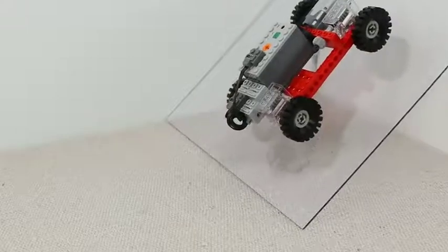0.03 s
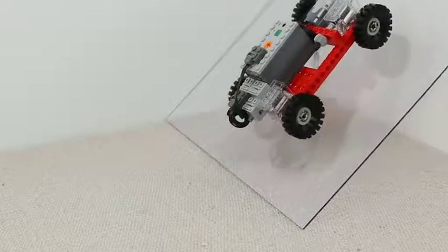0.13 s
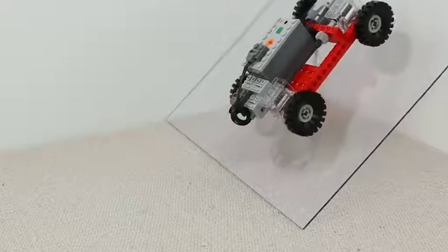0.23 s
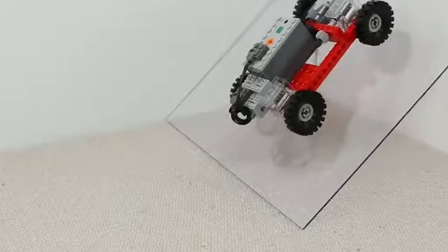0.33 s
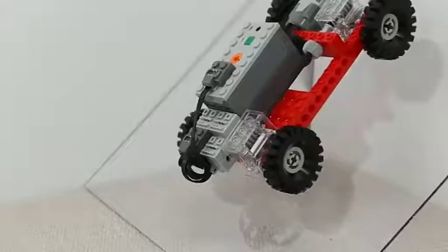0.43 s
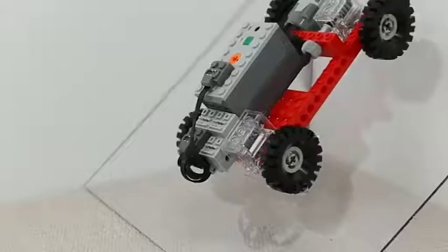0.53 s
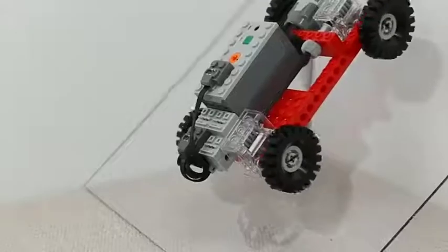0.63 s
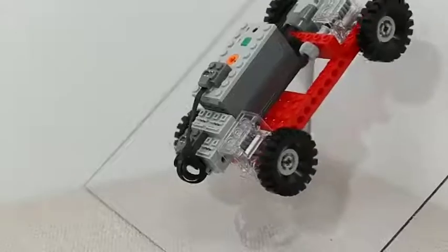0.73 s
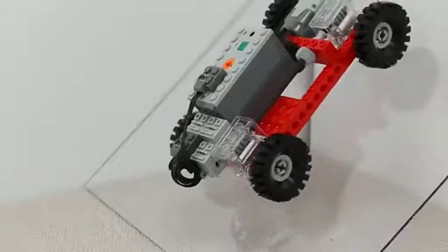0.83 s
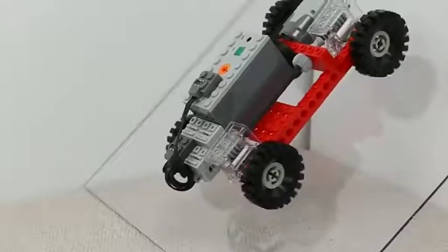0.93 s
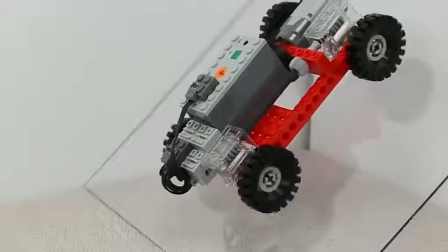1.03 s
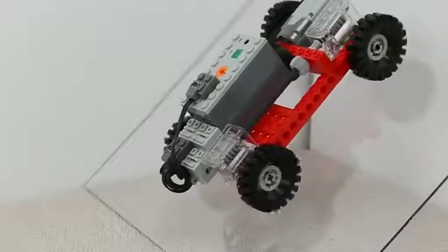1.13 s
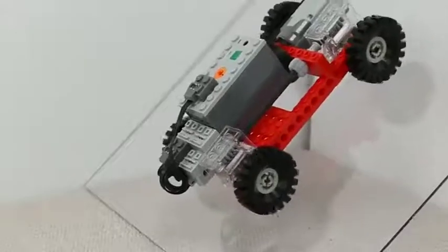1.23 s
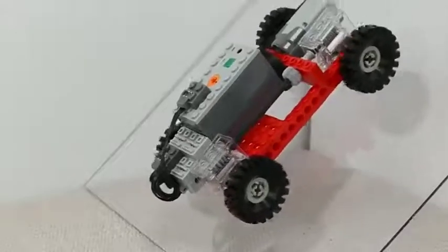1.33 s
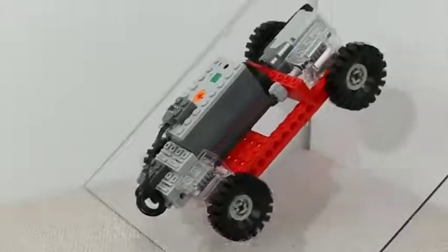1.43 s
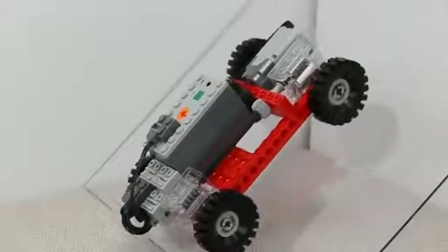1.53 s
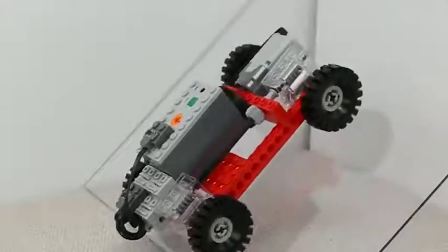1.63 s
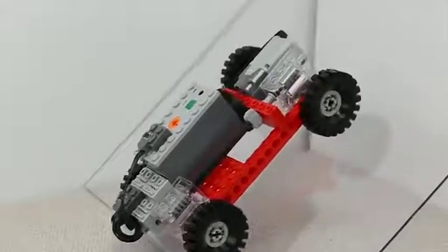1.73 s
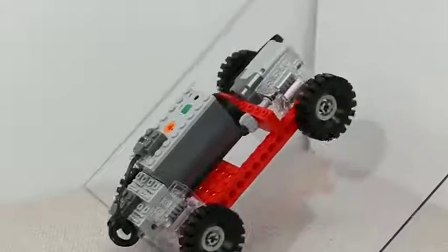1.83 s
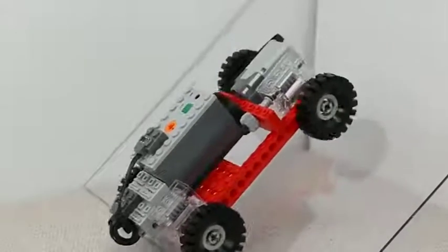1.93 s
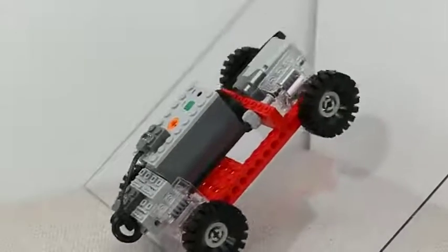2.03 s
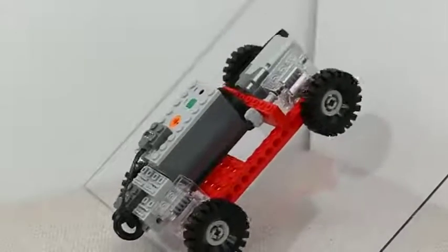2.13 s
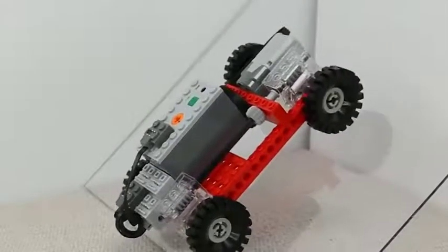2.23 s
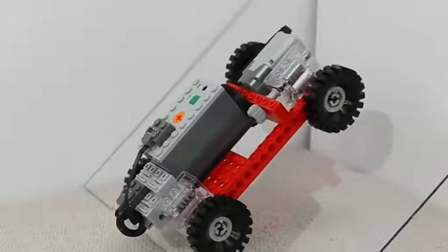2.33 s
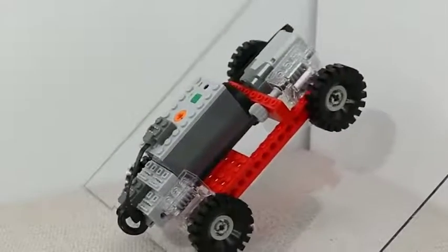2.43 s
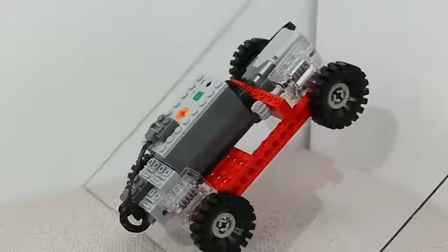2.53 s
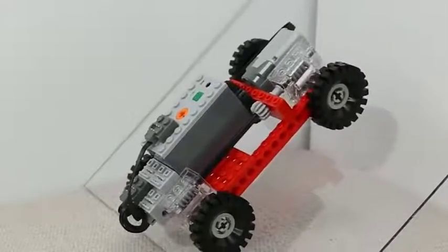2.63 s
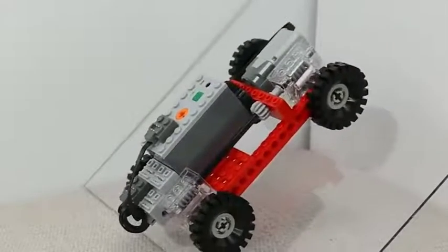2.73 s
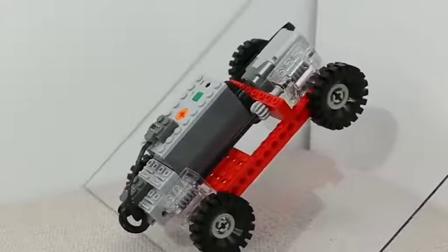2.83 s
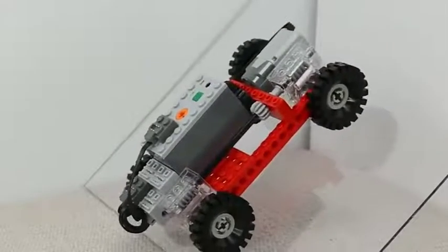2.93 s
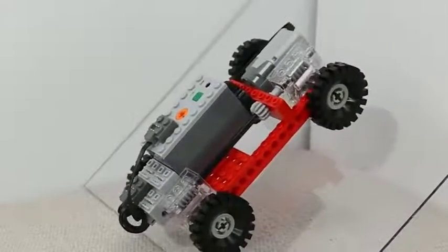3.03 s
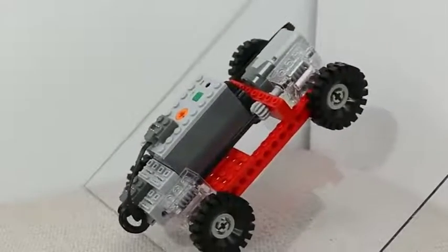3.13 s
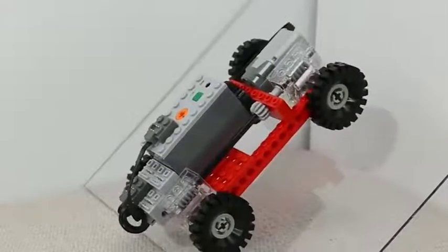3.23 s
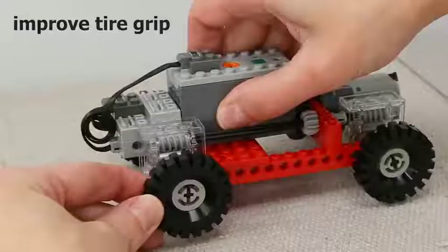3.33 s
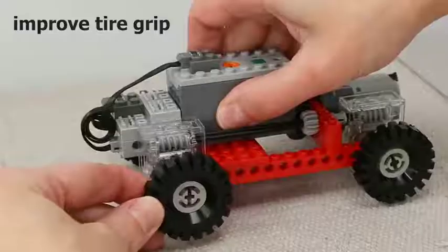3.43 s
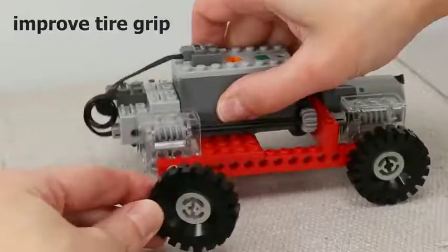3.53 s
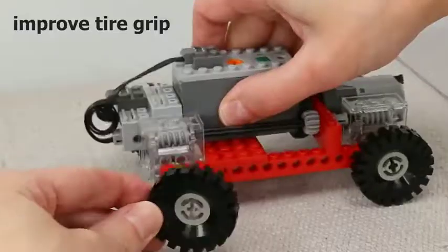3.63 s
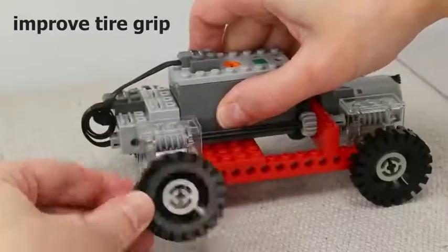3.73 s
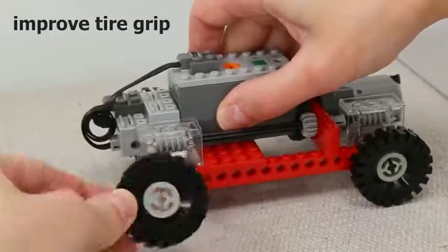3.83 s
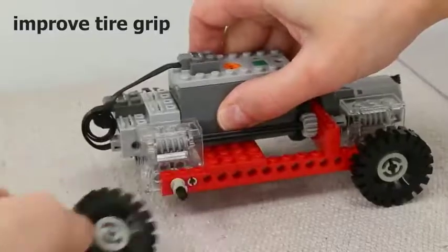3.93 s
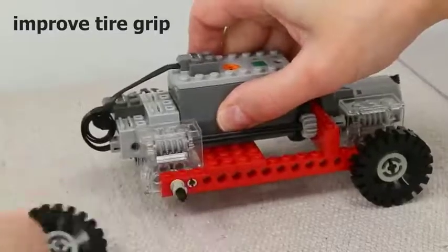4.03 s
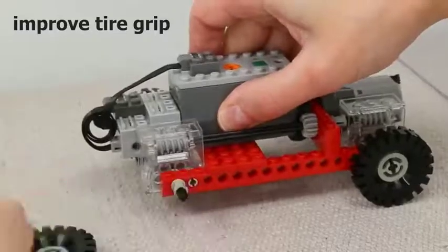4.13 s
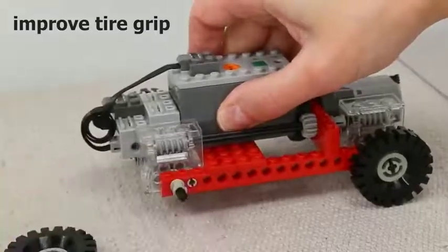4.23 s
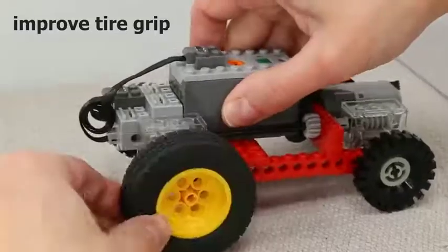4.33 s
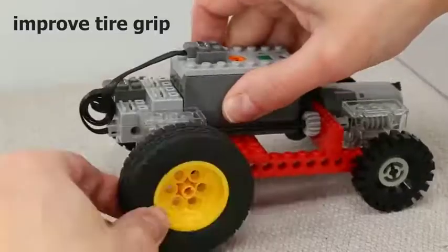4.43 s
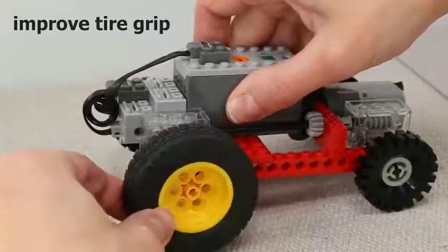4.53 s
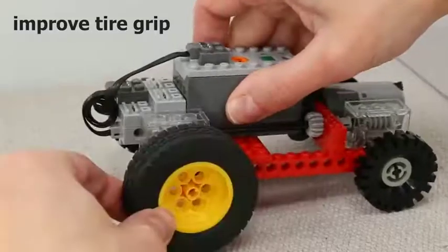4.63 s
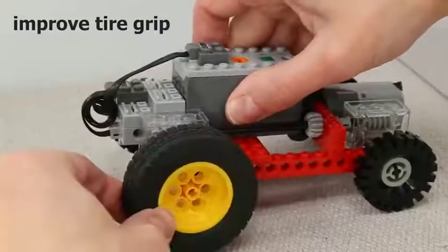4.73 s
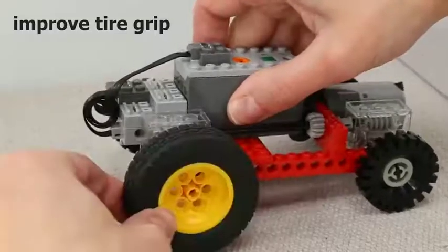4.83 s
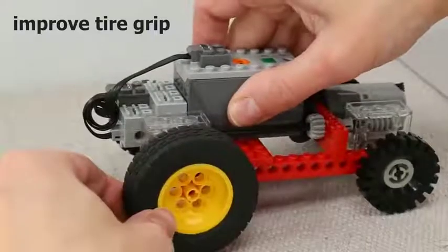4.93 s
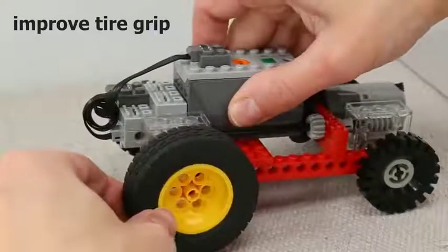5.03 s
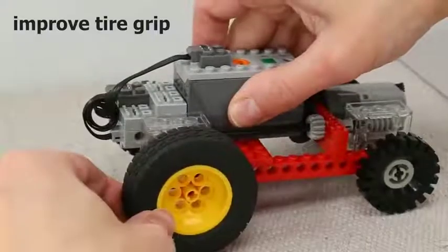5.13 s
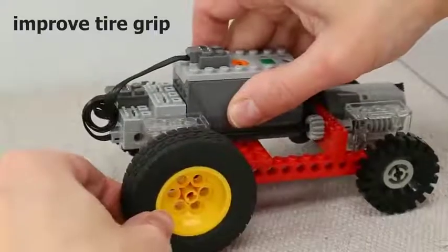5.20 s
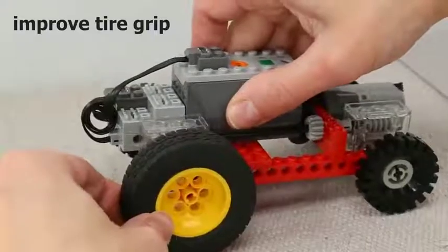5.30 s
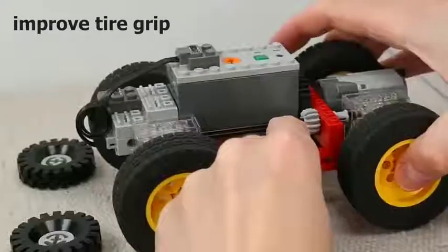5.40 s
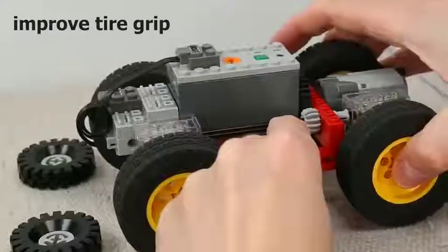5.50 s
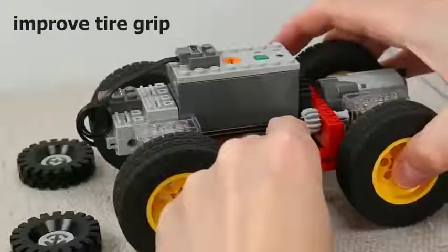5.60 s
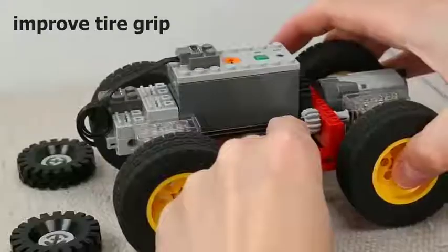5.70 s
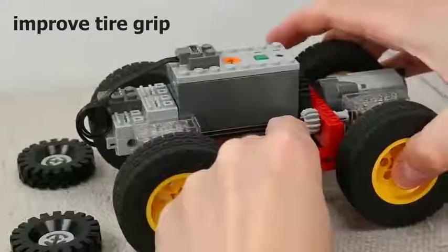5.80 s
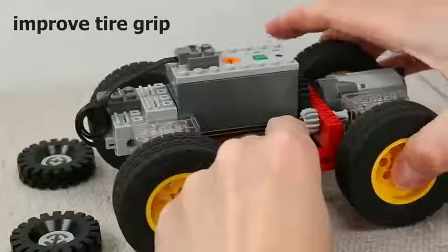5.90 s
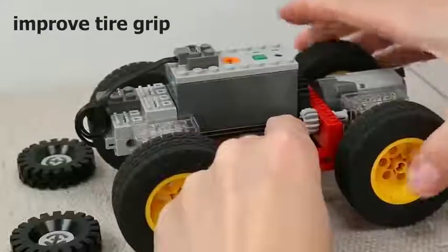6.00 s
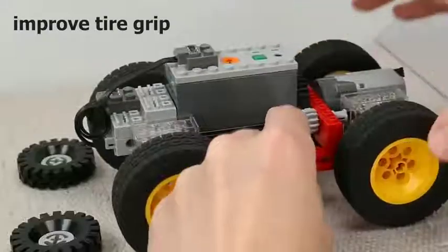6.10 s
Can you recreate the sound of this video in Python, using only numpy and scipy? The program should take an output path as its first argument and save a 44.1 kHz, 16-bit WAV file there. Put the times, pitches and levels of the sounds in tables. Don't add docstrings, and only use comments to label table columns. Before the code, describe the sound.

Buzzing, grinding toy gears strain and skip on a humming plastic sheet, stop dead, then soft rustles, a rubbery thud, and small hard clicks in a quiet room.

```python
import sys
import numpy as np
from scipy import signal
from scipy.fft import rfft, irfft, next_fast_len
from scipy.io import wavfile
from scipy.ndimage import uniform_filter1d

SR = 44100
rng = np.random.default_rng(int(sys.argv[2]) if len(sys.argv) > 2 else 0)


def attenuation_scalar(level_db):
    decades = np.asarray(level_db, float) / 20
    return 10 ** decades


def bounce(signal):
    frames = np.transpose(np.atleast_2d(signal))
    limited = np.clip(frames, -1, 1)
    pcm = np.round(limited * 32767).astype(np.int16)
    wavfile.write(sys.argv[1], SR, pcm)


N = 271654

# (time [s], peak level [dB], ring frequency [Hz])
SKIPS = [(0.042, -16.5, 3150), (0.1038, -21, 3050), (0.181, -24, 2900), (0.7555, -22, 4600),
         (0.8157, -20, 3400), (0.9102, -15, 4270), (0.933, -15, 4500), (0.9916, -20, 3390),
         (1.1663, -23, 4400), (1.3469, -19.5, 4370), (1.4305, -29, 4080), (1.4606, -21.5, 3640),
         (1.5095, -24, 3400), (1.531, -13, 3100), (1.62, -17, 3650), (1.7448, -21, 4480),
         (1.9108, -10, 3900), (2.1413, -23, 3650), (2.173, -31, 4640), (2.254, -28, 3680),
         (2.39, -19.5, 3770), (2.4913, -28, 3420)]
STOP_S = 2.595
SLIDE_S, SLIDE_LASTS_S = 1.63, 0.082
STEADY_S = 0.089


def rms_one(x):
    return x / np.sqrt(np.mean(x ** 2) + 1e-20)


def in_time(rows, before_db=-120, after_db=-120):
    s, *columns = np.transpose(rows)
    t = np.arange(N) / SR
    return [np.interp(t, s, column, before_db, after_db) for column in columns]


def bell(s, half):
    return np.exp(-2 * ((np.arange(N) / SR - s) / half) ** 2)


def drift(rate):
    r = np.exp(-2 * np.pi * rate / SR)
    slow = signal.lfilter([1], [1, -2 * r, r * r], rng.standard_normal(N + SR))
    return rms_one(slow[SR:])


def evened(x, span_s):
    power = uniform_filter1d(x ** 2, round(span_s * SR))
    return rms_one(x / (power + .05 * np.mean(x ** 2)) ** .4)


def colour(x, spectrum, peaks=()):
    size = next_fast_len(N)
    hz = np.arange(size // 2 + 1) * SR / size + 1
    points = np.array(spectrum)
    db = np.interp(np.log(hz), np.log(points[:, 0]), points[:, 1])
    for centre_hz, width_hz, peak_db in peaks:
        db = db + peak_db / (1 + (2 * (hz - centre_hz) / width_hz) ** 2)
    return rms_one(irfft(rfft(x, size) * attenuation_scalar(db), size)[:N])


def band(x, low_hz, high_hz, order=2):
    sos = signal.butter(order, [low_hz, min(high_hz, 19000)], "band", fs=SR, output="sos")
    return signal.sosfilt(sos, x)


def moving_band(x, hz, width_hz):
    turn = np.exp(2j * np.pi * np.cumsum(hz) / SR)
    r = np.exp(-np.pi * width_hz / SR)
    return 2 * np.real(signal.lfilter([1 - r], [1, -r], x / turn) * turn)


def octave_parts(x):
    lows = []
    for hz in 800 * 1.6 ** np.arange(7):
        lows.append(signal.sosfiltfilt(signal.butter(2, hz, fs=SR, output="sos"), x))
    return np.diff([0 * x] + lows + [x], axis=0)


def resonances(x, modes):
    out = 0
    for k, (hz, width_hz, db) in enumerate(modes):
        r = np.exp(-np.pi * width_hz / SR)
        a = [1, -2 * r * np.cos(2 * np.pi * hz / SR), r * r]
        mode = (1 - r * r) / 2 * signal.lfilter([1, 0, -1], a, x)
        out = out + (-1) ** k * attenuation_scalar(db) * mode
    return rms_one(out)


def struck(modes, t):
    return sum(attenuation_scalar(db - 60 * t / t60) * np.sin(2 * np.pi * hz * t) for hz, db, t60 in modes)


def add(out, x, s):
    at = round(s * SR)
    out[at:at + len(x)] += x[:N - at]


def gear_knocks():
    rotor_hz, teeth_per_s = 124.7, 2600
    turn = 2 * np.pi * np.cumsum(rotor_hz * (1 + .015 * drift(1.92))) / SR
    force_db = 3.5 * np.minimum(rng.exponential(1, N), 3.5)
    force = attenuation_scalar(force_db) * rng.choice([-1, 1], N)
    teeth = rms_one(force * (rng.random(N) < teeth_per_s / SR))
    motor_brushes = 1.2 * rng.standard_normal(N)
    clumps = attenuation_scalar(1.4 * drift(120))
    return (teeth + motor_brushes) * clumps * (1 + .15 * np.cos(turn))


def frame_response(knocks):
    # (frequency [Hz], level [dB per Hz])
    gear_spectrum = [(320, -20.5), (550, -3), (950, -4.5), (1300, -2.5), (2000, -1), (3000, -2),
                     (4200, -12.5), (5200, -11.5), (6400, -17.5), (8300, -21.5), (10500, -30),
                     (13000, -37.5), (15600, -40.5)]
    # (frequency [Hz], width [Hz], level over the broad rattle [dB], below 0 counts as 0)
    frame_modes = [(695, 12, 7), (1022, 14, 7), (1234, 25, 14), (1517, 93, 9), (1920, 70.3, -7.5),
                   (2615, 41.3, -5), (2900, 85, 4.5), (3400, 46, 7.5), (3650, 90, 9), (3980, 71, 9),
                   (4480, 120, 11), (5805, 150, 5.5), (6140, 160, 5.5), (6710, 42, -6.5), (11600, 550, 4),
                   (14100, 490, 2.5)]
    # (time [s], frequency [Hz], depth [0-1])
    shadow = [
        (0, 5300, .4),
        (.5, 5300, .7),
        (1.1, 5200, .92),
        (1.7, 5000, .85),
        (2.7, 4850, .88),
    ]
    broad = colour(knocks, gear_spectrum)[:3 * SR]
    size = len(broad)
    rattle, strain, load = broad, drift(9.3), drift(27.0)
    for k, (hz, width_hz, db) in enumerate(frame_modes):
        own = slice(9000 * k, 9000 * k + size)
        gain = (attenuation_scalar(max(db, 0)) - 1) * attenuation_scalar(3.0 * load[own])
        rattle = rattle + gain * moving_band(broad, hz * (1 + .011 * strain[own]), width_hz)
    shadow_hz, depth = (column[:size] for column in in_time(shadow, after_db=-5))
    shadow_hz = shadow_hz * (1 + .014 * strain[-size:])
    rattle = rattle - depth * moving_band(rattle, shadow_hz, 520)
    rattle = rattle - 0.79 * depth * moving_band(rattle, 12200 + .5 * shadow_hz, 350)
    parts = [part * attenuation_scalar(1.3 * drift(21)[:size]) for part in octave_parts(rattle)]
    low = evened(sum(parts[:5]), STEADY_S)
    high = evened(sum(parts[5:]), STEADY_S)
    return np.pad(low, (0, N - size)), np.pad(high, (0, N - size))


def gear_train(knocks):
    # (time [s], level around the mean [dB])
    effort = [
        (0, -3.5),
        (.1, 0),
        (.5, -0.5),
        (.8, -1),
        (.97, 0),
        (1.2, -1.5),
        (1.52, 1),
        (1.75, -0.5),
        (2.5, 1.5),
    ]
    # (time [s], loss [dB])
    slacks = [(.17, 5), (.3, 1.5), (.43, 3), (.52, -2), (.57, 2), (.64, 1), (.83, 2.5), (1.071, 4),
              (1.33, 3), (1.65, 2), (1.801, 3), (1.87, 0), (2.05, 3), (2.121, 5), (2.301, 5), (2.381, 5),
              (2.46, 3.5), (2.5, -4.5), (2.55, 3)]
    t = np.arange(N) / SR
    load_db = in_time(effort, after_db=-2.5)[0]
    load_db = load_db - sum(lost_db * bell(s, 0.043) for s, lost_db in slacks)
    off = np.maximum(t - STOP_S, 0)
    stop_db = np.maximum(-705 * off, -24 - 290 * off)
    rattle_db = -31.5 + load_db + stop_db
    hiss_db = -34.5 + .7 * load_db + stop_db
    hiss_db += sum(0.29 * max(db + 26, 0) * bell(s + 0.009, .03) for s, db, _ in SKIPS)
    rattle, hiss = frame_response(knocks)
    slid = np.clip((t - SLIDE_S) / SLIDE_LASTS_S, 0, 1)
    hiss = hiss + 0.24 * slid * moving_band(hiss, np.full(N, 5850), 520)
    return attenuation_scalar(rattle_db) * rattle + attenuation_scalar(hiss_db) * hiss


def clear_sheet(knocks):
    # (frequency [Hz], width [Hz], level [dB])
    middle_modes = [(273.8, 23.5, -0.5), (297, 52.5, -8.5)]
    low_modes = [(98, 82, -14), (132.9, 9.2, 0.5), (181.7, 25, -7)]
    # (frequency [Hz], width [Hz], level [dB])
    upper_modes = [(366, 32, -4.5), (391, 11, 1), (440, 24.4, -7.5), (488, 36, -8)]
    # (time [s], level [dB])
    upper_share = [
        (0, -4),
        (.3, -1.5),
        (1.05, -1),
        (1.3, -0.5),
        (1.5, -7),
        (1.65, -10.5),
        (1.9, -1),
        (2.7, -2),
    ]
    # (time [s], thump [dB], half length [s], hum [dB])
    bites = [(.11, 5, 0.032, 2), (0.368, 1, 0.06, 5), (0.524, 8.5, .06, 2.5), (0.71, -4.5, .05, 4.5),
             (.88, 1.5, 0.058, 5), (1.0, 12, 0.091, 8), (1.28, 2, .05, 0), (1.48, 9.5, 0.13, 5.5),
             (1.57, 2.5, 0.063, 6.5), (1.78, 9, 0.071, 9), (1.911, 12, 0.026, 5), (2.034, -7, 0.038, 5),
             (2.19, 6, 0.022, 10), (2.516, 3, 0.13, 7)]
    t = np.arange(N) / SR
    off = np.maximum(t - STOP_S, 0)
    slid = np.clip((t - SLIDE_S) / SLIDE_LASTS_S, 0, 1)
    thump_db = -45.5 + sum(db * bell(s, half) for s, db, half, _ in bites) - 145 * off
    hum_db = -38 + sum(db * bell(s, half) for s, _, half, db in bites)
    hum_db = hum_db - 9 * slid - 337 * off
    tyres = rng.standard_normal(N) * attenuation_scalar(0.99 * drift(21.8)) + 0.099 * knocks
    upper = attenuation_scalar(*in_time(upper_share)) * evened(resonances(tyres, upper_modes), STEADY_S)
    middle = evened(resonances(tyres, middle_modes), STEADY_S)
    hum = band(middle - upper, 160, 1100) / 1.42
    thump = evened(band(resonances(tyres, low_modes), 82, 260, order=3), STEADY_S)
    return attenuation_scalar(hum_db) * hum + attenuation_scalar(thump_db) * thump


def car():
    knocks = gear_knocks()
    return gear_train(knocks) + clear_sheet(knocks)


def skips(ring_s, level_db):
    out, t = np.zeros(N), np.arange(SR // 20) / SR
    envelope = t / ring_s * np.exp(1 - t / ring_s)
    for (s, db, hz), noise in zip(SKIPS, rng.standard_normal((len(SKIPS), len(t)))):
        ring = rms_one(band(noise, .93 * hz, 1.07 * hz)) * envelope
        add(out, attenuation_scalar(db + level_db) * ring, s)
    return out


def spits():
    # (time [s], level [dB])
    releases = [(.045, -49.5), (.47, -53), (.54, -50), (.8, -54), (.89, -48.5), (.925, -53), (1.04, -52),
                (1.44, -45.5), (1.49, -53.5), (1.55, -50), (1.59, -42), (1.885, -50), (1.93, -47),
                (2.35, -54.5), (2.43, -46)]
    grains = rng.standard_normal(N) * attenuation_scalar(2.0 * drift(150))
    noise = rms_one(band(grains, 7000, 15500, order=1))
    return noise * sum(attenuation_scalar(db) * bell(s, .014) for s, db in releases)


def thuds():
    # (time [s], peak level [dB], frequency [Hz], swell [s], fall [s])
    rocks = [(3.569, -26.5, 134.3, 0.035, 0.023), (4.051, -33.5, 138, 0.064, 0.024),
             (4.157, -12.5, 136, 0.0081, 0.034), (4.197, -33, 140, 0.006, 0.019),
             (4.212, -21, 134, 0.0092, 0.05), (4.265, -27.5, 118, 0.0088, 0.023),
             (4.3, -40.5, 142, .012, .015), (4.325, -42, 140, .012, 0.035),
             (5.058, -46.5, 140, 0.01, 0.027), (5.558, -36, 139, 0.014, 0.038),
             (5.988, -45.5, 129, 0.014, .015), (6.104, -43, 196, 0.0071, 0.016),
             (6.129, -44, 199, 0.0086, 0.043)]
    out = np.zeros(N)
    for s, db, hz, swell, fall in rocks:
        t = np.arange(round((swell + fall) * SR)) / SR
        rise = np.sin(np.pi / 2 * t / swell)
        decay = np.cos(np.pi / 2 * (t - swell) / fall)
        shape = np.maximum(np.where(t < swell, rise, decay), 0) ** 0.89
        upper = np.sin(2 * np.pi * 1.93 * hz * t) + 1.1 * np.sin(2 * np.pi * 1.4 * hz * t)
        overtone_db = max(3 + 0.81 * db, -26.5)
        add(out, attenuation_scalar(db) * shape * (np.sin(2 * np.pi * hz * t) + attenuation_scalar(overtone_db) * upper), s)
    return out


def clicks():
    # (time [s], peak level [dB], low [Hz], high [Hz], t60 [s])
    contacts = [(3.1465, -68.5, 1800, 11800, 0.042), (3.569, -42.5, 586, 3700, 0.15),
                (3.57, -55.5, 4000, 9500, 0.07), (3.678, -57.5, 1000, 5000, 0.052),
                (4.156, -36, 1800, 3400, 0.022), (4.157, -29, 530, 710, .06), (4.172, -31, 420, 540, 0.059),
                (4.27, -51, 400, 800, 0.07), (4.511, -61.5, 800, 2970, .06),
                (4.606, -44, 2500, 12500, 0.034), (4.725, -56, 1800, 6000, .05),
                (4.79, -52, 500, 6000, 0.022), (4.79, -55, 6000, 15000, 0.024),
                (4.933, -54, 2500, 13000, 0.033), (5.056, -45.5, 600, 2000, 0.077),
                (5.552, -31.5, 730, 1860, 0.055), (5.552, -50, 2200, 7060, 0.018),
                (6.108, -45.5, 1300, 3500, 0.044), (6.108, -54, 5000, 7550, 0.081),
                (6.116, -43, 1370, 3170, 0.037)]
    # (frequency [Hz], level [dB], t60 [s])
    hub_modes = [(845, -24, .05), (1050, 0, .03), (1104, -22, .09), (1233, -3, .03), (1550, -7, .025),
                 (2700, -26, .02)]
    # (time [s], level [dB])
    hub_hits = [
        (4.607, -51),
        (4.622, -49),
        (5.055, -45),
        (5.552, -20),
    ]
    # (frequency [Hz], width [Hz], level [dB])
    wheel_modes = [(480, 60, 1), (630, 90, 0), (790, 90, -12), (1130, 150, -12), (2000, 300, -19),
                   (2700, 400, -22)]
    out, t = np.zeros(N), np.arange(SR // 4) / SR
    onset = np.minimum(t / .0012, 1)
    noises = rng.standard_normal((len(contacts), len(t)))
    for (s, db, low_hz, high_hz, t60), noise in zip(contacts, noises):
        crack = rms_one(band(noise, low_hz, high_hz, order=3))
        add(out, attenuation_scalar(db - 60 * t / t60) * onset * crack, s)
    for s, db in hub_hits:
        add(out, attenuation_scalar(db) * onset * struck(hub_modes, t), s)
    shudder = band(resonances(rng.standard_normal(len(t)), wheel_modes), 210, 3000, order=4)
    add(out, attenuation_scalar(-21 - 60 * t / .08) * onset * shudder, 4.1575)
    return out


def brushes():
    # (time of the middle [s], level [dB], half length [s], low [Hz], high [Hz])
    strokes = [
        (3.148, -70, 0.022, 600, 8800),
        (3.596, -56, 0.02, 1190, 9500),
        (3.69, -70.5, 0.02, 6500, 9000),
        (3.783, -59, 0.059, 455, 3800),
        (3.78, -71, 0.051, 4470, 11500),
        (4.079, -64, 0.089, 500, 3300),
        (4.79, -78, 0.06, 900, 5000),
        (4.924, -68, .011, 6500, 8800),
    ]
    noise = rng.standard_normal(N) * attenuation_scalar(2.45 * drift(80))
    out = np.zeros(N)
    for s, db, half, low_hz, high_hz in strokes:
        out += attenuation_scalar(db) * bell(s, half) * rms_one(band(noise, low_hz, high_hz))
    return out


def hands():
    # (frequency [Hz], level [dB per Hz])
    rustle_spectrum = [(400, 4.5), (1200, 6.5), (2500, 2.5), (4000, -5), (5200, -11.5), (8000, -10.5),
                       (14000, -19.5)]
    # (frequency [Hz], width [Hz], level [dB])
    board_modes = [(100, 75, -7.5), (145, 48, 0.5), (188, 106, -6.5), (257, 120, -16.5)]
    # (time [s], level around the mean [dB])
    handling = [
        (2.62, 0.5),
        (3.22, -2),
        (3.52, 0),
        (3.66, 5),
        (3.95, -1),
        (4.63, 2),
        (5.3, -1.5),
        (5.95, -1),
        (6.16, 5.5),
    ]
    busy_db, = in_time(handling, after_db=4)
    rustle = colour(rng.standard_normal(N) * attenuation_scalar(1.5 * drift(40)), rustle_spectrum)
    rumble = resonances(rng.standard_normal(N) * attenuation_scalar(1.0 * drift(2.6)), board_modes)
    rumble = rms_one(band(rumble, 70, 330))
    return attenuation_scalar(-66.5 + 0.98 * busy_db) * rustle + attenuation_scalar(-60 + 1.3 * busy_db) * rumble


def room_tone():
    # (frequency [Hz], level [dB per Hz])
    room_spectrum = [(15, -47), (25, -27), (86, -1), (140, 2.5), (173, -10.5), (253, -1.5), (340, -18),
                     (482, -8), (1170, -15), (2120, -28), (3090, -23), (5010, -39.5), (6210, -28),
                     (9550, -29.5), (15500, -39)]
    tone = colour(rng.standard_normal(N), room_spectrum)
    return attenuation_scalar(-67) * tone / np.std(band(tone, 240, 17000))


def scene():
    toy = car() + skips(ring_s=0.0025, level_db=-12) + spits()
    handled = thuds() + clicks() + brushes() + hands()
    return np.tile(toy + handled + room_tone(), (2, 1))


def band_limit(x):
    return signal.sosfilt(signal.butter(12, 15740, fs=SR, output="sos"), x)


def record(dry):
    overload = .42
    top_cut = signal.ellip(12, .3, 70, 15720, fs=SR, output="sos")
    rounded = overload * np.tanh(dry / overload)
    return band_limit(signal.sosfilt(top_cut, rounded))


dry = scene()
out = record(dry)
bounce(out)
```